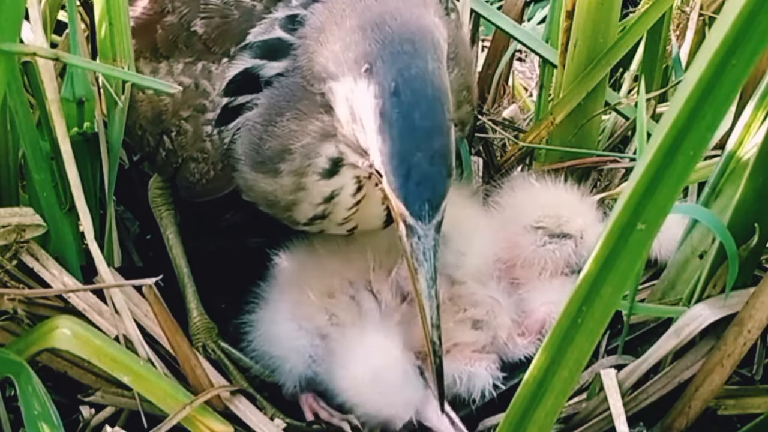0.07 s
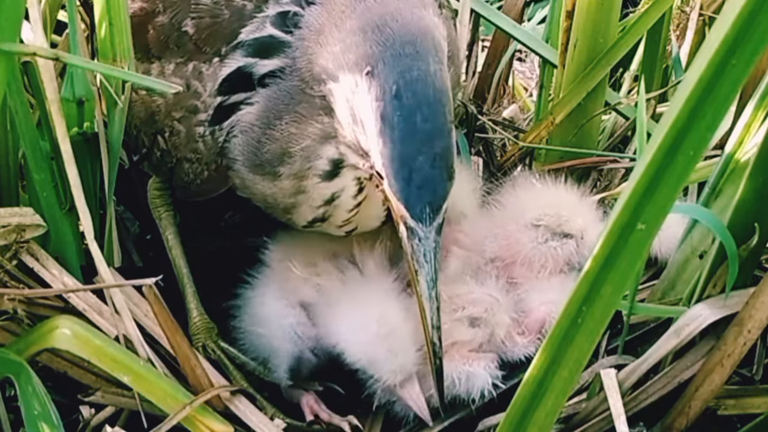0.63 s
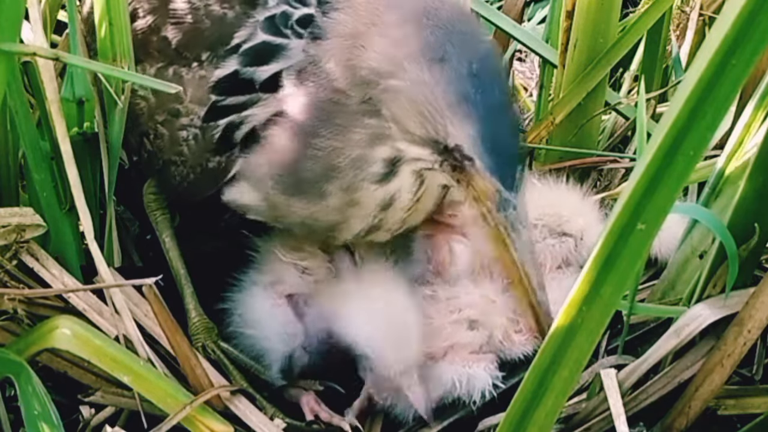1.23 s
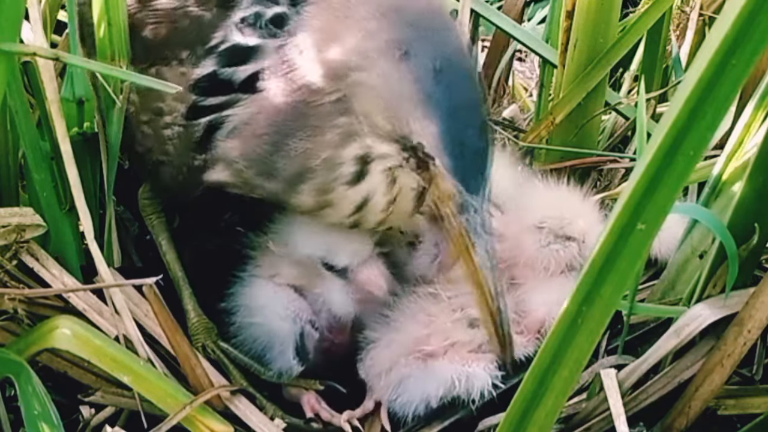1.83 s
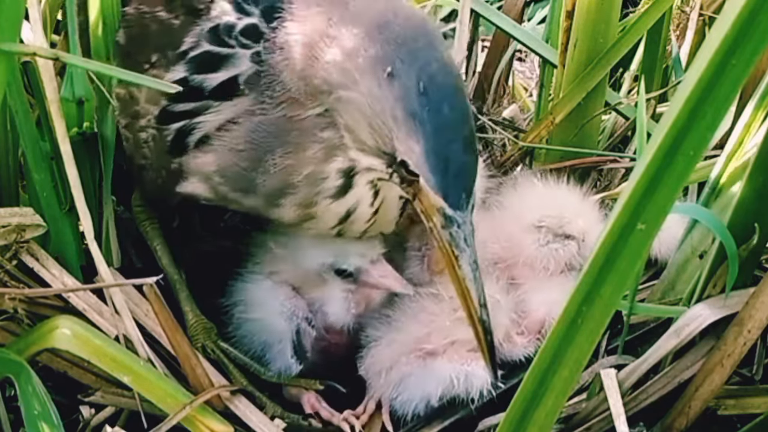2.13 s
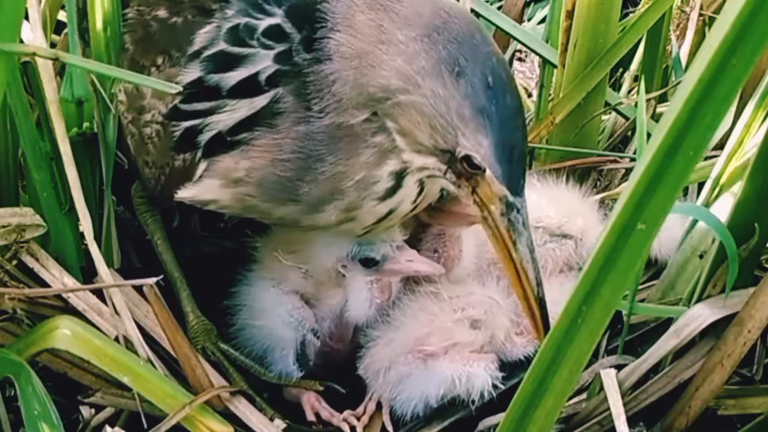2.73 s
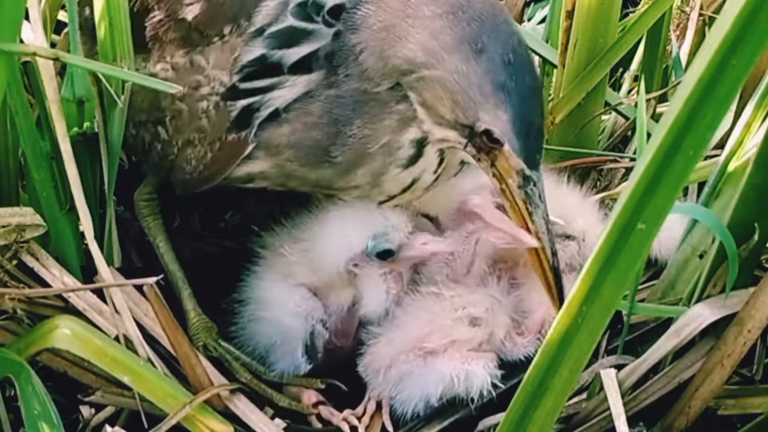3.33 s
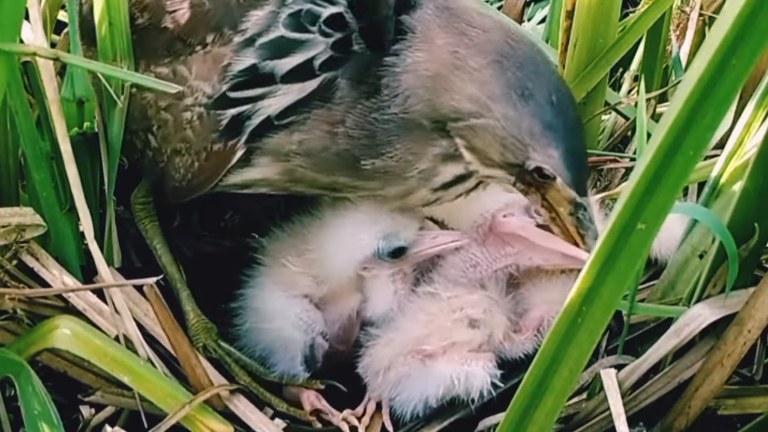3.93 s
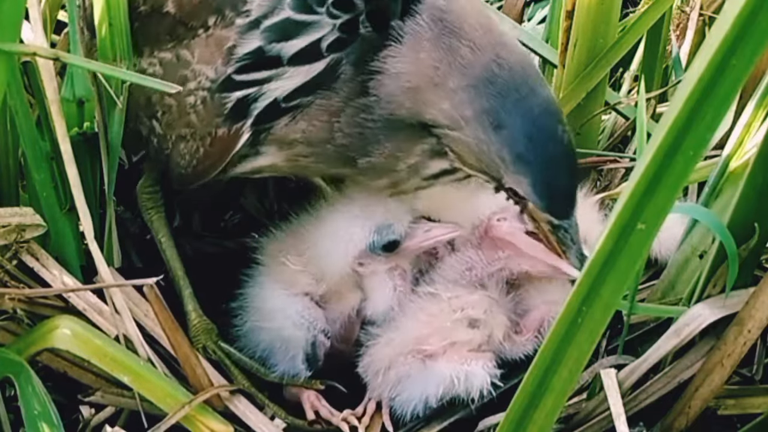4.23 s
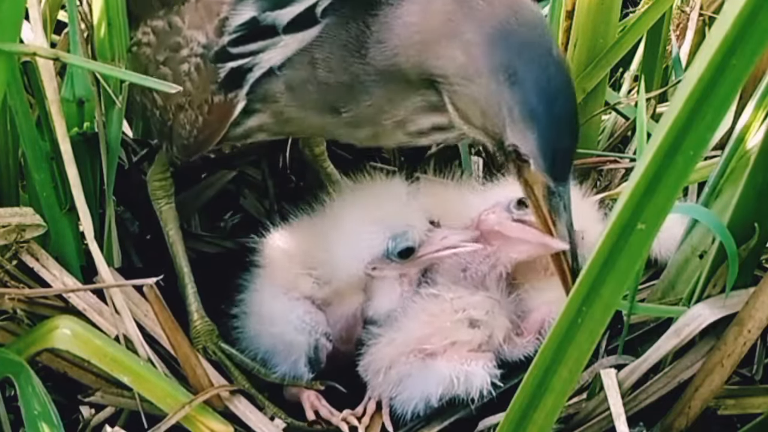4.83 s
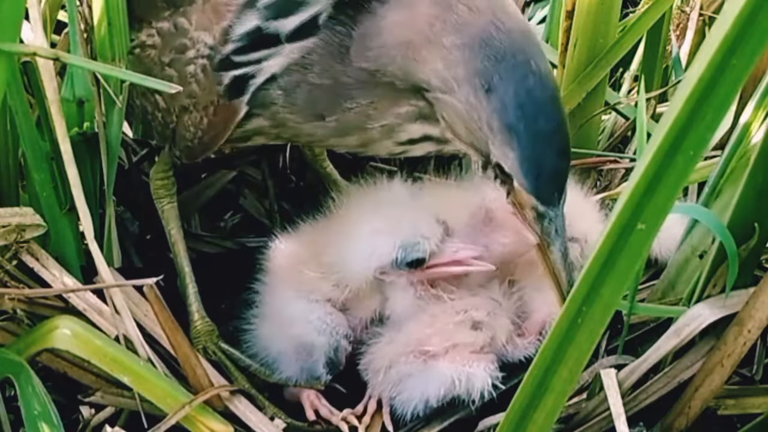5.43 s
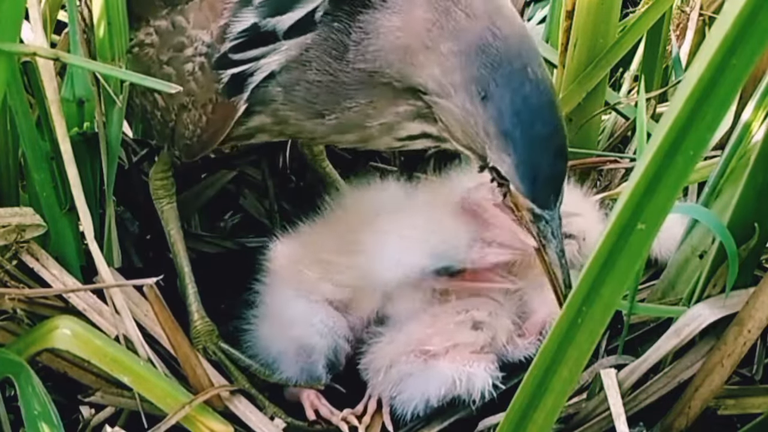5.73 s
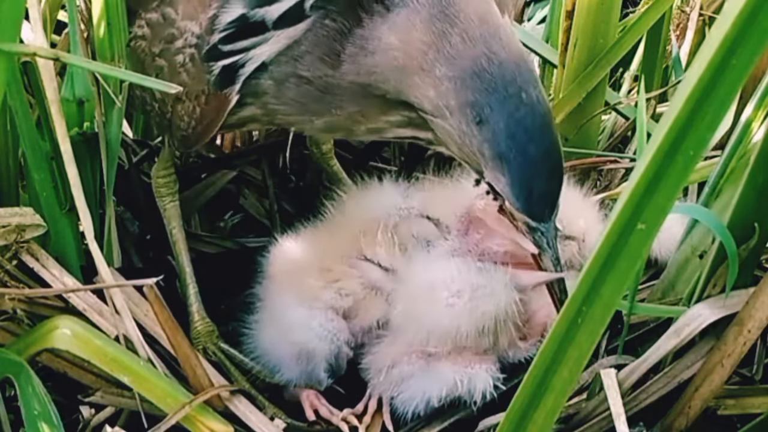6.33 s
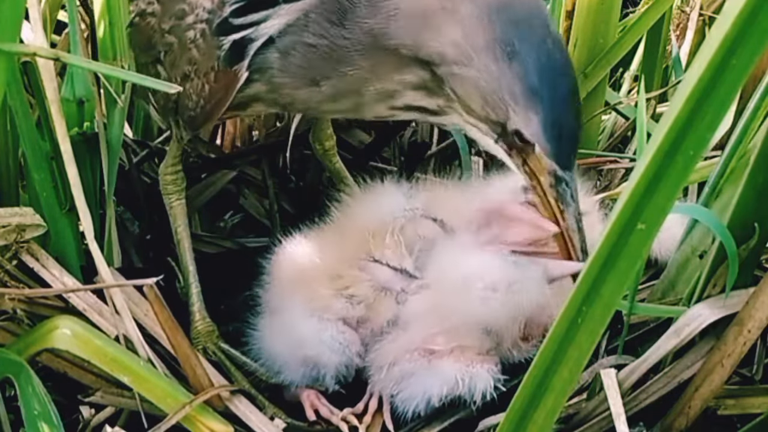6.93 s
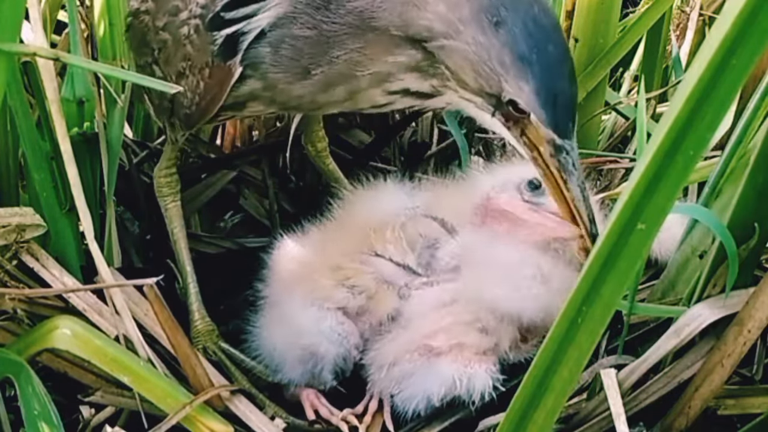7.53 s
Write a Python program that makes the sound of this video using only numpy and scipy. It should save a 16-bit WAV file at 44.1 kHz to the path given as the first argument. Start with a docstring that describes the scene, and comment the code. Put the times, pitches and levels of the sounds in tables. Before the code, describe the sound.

Young herons beg near the microphone in a marsh: first a high cry and short squeals cracking into creaks, later a run of rapid, hoarse, clicking twitters. The parent faintly scuffs and taps the reeds. In the middle, songbirds sing from farther away with falling whistles and repeated syllables, blurred by a short echo. Behind it all are a soft wash of distant birds and a low, faintly humming rumble.

```python
"""Heron chicks in the reeds

Heron chicks beg in a nest: squeals that break into creaks, then quick raspy twitters, while a
parent brushes the reeds. Songbirds slur and whistle farther off, their notes smeared by the trees.
Under it all lie the haze of a distant chorus and a low rumble with a faint hum."""
import sys
import numpy as np
from scipy import signal
from scipy.fft import rfft, irfft, next_fast_len
from scipy.io import wavfile
from scipy.ndimage import uniform_filter1d, map_coordinates

SR = 44100
rng = np.random.default_rng(int(sys.argv[2]) if len(sys.argv) > 2 else 0)


def dump_mix(stems):
    """Bounce the given channels to the path in sys.argv[1] as a 16-bit WAV at rate SR."""
    frames = np.atleast_2d(stems).T  # one column per channel
    limited = np.clip(frames, -1, 1)  # hard clip at full scale
    pcm = np.round(limited * 32767).astype(np.int16)
    wavfile.write(sys.argv[1], SR, pcm)


N = 339129
T = np.arange(N) / SR


def amp(db):
    """Turn decibels into a number to multiply by."""
    return 10 ** (np.asarray(db) / 20)


def unit(x):
    """Scale a signal so that its typical size (rms) is 1."""
    return x / np.sqrt(np.mean(x ** 2) + 1e-20)


def clock(length):
    """The time of each sample in a sound this many seconds long."""
    return np.arange(max(int(length * SR), 16)) / SR


def add(track, start, x):
    """Mix x into the track, beginning at start seconds."""
    i = int(np.clip(round(start * SR), 0, N))
    track[i:i + len(x)] += x[:N - i]


def wobble(t, rate):
    """A smooth random curve that heads for a new value rate times a second."""
    return map_coordinates(rng.standard_normal(int(t[-1] * rate) + 4), [t * rate])


def soft_ends(t, share):
    """Fade in and out; the two fades together take this share of the sound."""
    return signal.windows.tukey(len(t), share)


def phase_of(hz):
    """The running angle of a wave that follows this pitch."""
    return 2 * np.pi * np.cumsum(hz) / SR


def pulses(rate):
    """A 1 each time a cycle ends and 0 in between; rate is in cycles a second."""
    return np.diff(np.floor(np.cumsum(rate) / SR), prepend=-1)


def filtered(x, gain):
    """Turn each frequency in x up or down by gain(hz)."""
    size = next_fast_len(N + 8192)
    return irfft(rfft(x, size) * gain(np.fft.rfftfreq(size, 1 / SR)), size)[:N]


def coloured(x, spectrum):
    """Shape the tone of x with (f/Hz, level/dB) points; white noise keeps its power."""
    freqs, db = np.transpose(spectrum)
    return filtered(x, lambda hz: unit(amp(np.interp(np.log(hz + 1), np.log(freqs), db))))


def patchy_noise(depth_db):
    """Noise whose loudness drifts in patches of time and pitch."""
    spectra = signal.stft(rng.standard_normal(N), nperseg=1024)[2]
    patches = uniform_filter1d(rng.standard_normal(spectra.shape), size=16, axis=0)
    patches = uniform_filter1d(patches, size=6, axis=1)
    return unit(signal.istft(spectra * amp(depth_db * unit(patches)), nperseg=1024)[1][:N])


def echo(x, decay_s):
    """Plants scatter the sound into a blur that builds up, then falls 60 dB in decay_s."""
    t = clock(0.89)
    tail = rng.standard_normal(len(t)) * amp(-60 * t / decay_s) * (1 - np.exp(-t / .012))
    return signal.fftconvolve(x, tail / np.linalg.norm(tail))[:N]


def contour(points):
    """Join (t/s, f/Hz, level/dB) points into time, pitch and gain for every sample."""
    times, hz, db = np.transpose(points)
    t = clock(times[-1] - times[0])
    pitch = uniform_filter1d(np.interp(t + times[0], times, hz), size=120)
    gain = amp(np.interp(t + times[0], times, db)) * soft_ends(t, .03)
    return t, pitch, gain


def run(first, spacing, count):
    """Start times of evenly repeated notes."""
    return first + spacing * np.arange(round(count))


def repeated(shape, calls, waver):
    """One learnt bit of song, with slightly different pitch and stresses each time."""
    out = np.zeros(N)
    t, hz, gain = contour(shape)
    for start, db in calls:
        pitch = hz * (1 + waver * (rng.standard_normal() / 2 + wobble(t, 702)))
        add(out, start, amp(db + 1.3 * wobble(t, 121)) * gain * np.sin(phase_of(pitch)))
    return out


def glides(notes, waver, flutter_db, arch=0):
    """Whistles that slide in pitch; waver and the mid-note arch are shares of that pitch."""
    out = np.zeros(N)
    for start, length, first_hz, last_hz, db in notes:
        t = clock(length)
        slide = 1 / np.linspace(1 / first_hz, 1 / last_hz, len(t))  # fastest where highest
        pitch = slide * (1 + arch * np.sin(np.pi * t / length) + waver * wobble(t, 260))
        gain = amp(db + flutter_db * wobble(t, 90)) * soft_ends(t, .6)
        add(out, start, gain * np.sin(phase_of(pitch)))
    return out


RUMBLE_LEVELS = [(0, -57), (1.3, -57.5), (1.9, -54.5), (7.69, -54.5)]  # how loud the rumble is: t/s, level/dB
RUMBLE_COLOUR = [(25, -47), (90, -39), (125, -11), (180, 1), (400, -3.5), (600, -15.5), (1400, -14.5),
                 (8000, -33.5)]  # its mix of low and high: f/Hz, relative level/dB
HUM_TONES = [(312, -60.5), (339, -63.5)]  # the hum's two tones: f/Hz, level/dB before the swell
def rumble():
    """A far, low rumble with a wavering hum that slowly swells."""
    level = amp(np.interp(T, *np.transpose(RUMBLE_LEVELS)))
    noise = level * coloured(patchy_noise(depth_db=1.5), RUMBLE_COLOUR)
    hum = np.zeros(N)
    for hz, db in HUM_TONES:
        gain = amp(db + 0.79 * wobble(T, 14))
        hum += gain * np.sin(phase_of(hz * (1 + 0.00388 * wobble(T, 6))))
    swell = amp(np.interp(T, [1.5, 6], [-7, 3]))
    return noise + swell * hum


CHORUS_LEVELS = [(.7, -45.5), (1.3, -48.5), (2.3, -41), (2.9, -43), (6, -40), (6.5, -42.5)]  # how busy the distant birds are: t/s, relative level/dB
CHORUS_COLOUR = [(900, -26.5), (1850, -2), (2400, 4), (3300, 6.5), (4500, 3), (5250, -5.5), (7600, -12),
                 (8600, -48)]  # their mix of low and high: f/Hz, relative level/dB
def chorus():
    """The birds of the marsh, so far away that they blur into a haze of noise."""
    level = amp(np.interp(T, *np.transpose(CHORUS_LEVELS)) - 7.5)
    return level * coloured(patchy_noise(depth_db=2), CHORUS_COLOUR)


def chatter(span_s, count, pitch_hz, spread, length_s, level_db):
    """Small notes from many bills, mostly sliding down, as loud as the chorus is busy."""
    starts = rng.uniform(*span_s, count)
    height, slide, stretch, stress = rng.standard_normal((count, 4)).T
    first_hz = pitch_hz * np.exp(spread * height)
    last_hz = first_hz * np.exp(spread * (slide / 2 - 1.5))
    db = np.interp(starts, *np.transpose(CHORUS_LEVELS)) + level_db + stress - 2 * height ** 2
    notes = zip(starts, length_s * amp(stretch), first_hz, last_hz, db)
    return glides(notes, waver=0.032, flutter_db=5.5)


# Long, distant notes: t/s, length/s, first f/Hz, last f/Hz, relative level/dB
FAR_NOTES = [(.33, 0.27, 3910, 3780, -51.5), (.6, 0.23, 2450, 2420, -56), (1.06, 0.22, 2410, 2350, -56),
             (3.09, 0.16, 2326, 2460, -40), (3.7, 0.19, 1940, 1734, -47), (4.41, 0.32, 2620, 1957, -41)]
THIN_WHISTLE = [(0, 0.1, 8270, 7850, -64)]  # one very high note, same columns
def far_whistles():
    """Birds far off hold notes that slide gently."""
    held = glides(FAR_NOTES, waver=.03, flutter_db=2)
    return held + glides(THIN_WHISTLE, waver=.0075, flutter_db=2)


TSEEW_SHAPE = [(0, 6420, -15), (.014, 5026, -1), (.033, 4974, -0.5), (.046, 4430, -3), (.085, 4140, -9.5)]  # one call: t/s from its start, f/Hz, relative level/dB
TSEEW_CALLS = [(2.472, -41.5), (2.839, -41.5), (3.877, -41.5), (6.619, -42), (7.337, -41.5)]  # each time it is sung: t/s, relative level/dB
def tseews():
    """A songbird's high "tseew", falling in two steps."""
    return repeated(TSEEW_SHAPE, TSEEW_CALLS, waver=0.02)


HOOK_NOTES = [(4.558, 4340, -40), (5.243, 4380, -39), (5.553, 5500, -51)]  # notes that drop and level out: t/s, held f/Hz, relative level/dB
def hooks(length_s=0.052, drop_hz=1565, settle_s=0.011):
    """Each whistle starts high and drops quickly onto its held note."""
    out, t = np.zeros(N), clock(length_s)
    for start, held_hz, db in HOOK_NOTES:
        pitch = held_hz + drop_hz * np.exp(-t / settle_s)
        add(out, start, amp(db) * np.sin(phase_of(pitch)) * soft_ends(t, .5))
    return out


SCRATCHES = [(3.956, .048, -50.5), (4.019, 0.069, -51.5)]  # scratchy bits of song: t/s, length/s, relative level/dB
def scratches(band_hz=(5200, 6600)):
    """Brief, soft swells of high, grainy noise."""
    out = np.zeros(N)
    band = signal.butter(2, band_hz, "bandpass", fs=SR, output="sos")
    for start, length, db in SCRATCHES:
        t = clock(length)
        grains = unit(signal.sosfilt(band, rng.standard_normal(len(t))) * amp(2 * wobble(t, 260)))
        add(out, start, amp(db) * grains * soft_ends(t, .5))
    return out


# A faint flick up, a quick arch and a fall: t/s from its start, f/Hz, relative level/dB
SYLLABLE_SHAPE = [(0, 4600, -5), (.009, 6200, -19), (.012, 3500, -11), (.018, 4950, -4), (.025, 3800, 2.5),
                  (.032, 4150, -2), (.039, 3600, -20), (.048, 3250, 2), (.06, 2980, 2), (.078, 2300, -11)]
# Its runs: first t/s, spacing/s, count, level/dB, echo level/dB relative to the song
SYLLABLE_RUNS = [(2.923, .1485, 5, -37.5, -2), (5.053, .1355, 6, -40.5, -10)]
def syllables():
    """A second songbird repeats one syllable, blurred by quick echoes off the reeds."""
    out = np.zeros(N)
    for first, spacing, count, db, echo_db in SYLLABLE_RUNS:
        calls = [(start, db) for start in run(first, spacing, count)]
        song = repeated(SYLLABLE_SHAPE, calls, waver=.027)
        out += song + amp(echo_db) * echo(song, decay_s=.16)
    return out


# Runs of falling notes: first t/s, spacing/s, count, length/s, first f/Hz, level/dB
FALLING_RUNS = [(2.589, .058, 5, .028, 4500, -39.5), (4.809, .039, 5, .016, 5100, -41),
                (6.277, 0, 1, .021, 5900, -41)]
RISE_TIMES = [3.715, 3.86]  # two rising notes: t/s
def slurs(rise_s=.055, rise_hz=(2030, 3550), rise_db=-39):
    """Quick sliding notes: most fall by a third of their pitch, two husky ones rise."""
    falls = [(start, length, hz, hz * 2 / 3, db)
             for first, spacing, count, length, hz, db in FALLING_RUNS
             for start in run(first, spacing, count)]
    rises = [(start, rise_s, *rise_hz, rise_db) for start in RISE_TIMES]
    return glides(falls, waver=.02, flutter_db=2) + glides(rises, waver=.05, flutter_db=2)


FLUTE_NOTES = [(1.98, .13, 1714, 1886, -47), (2.33, 0.087, 1990, 2130, -41.5),
               (2.748, 0.073, 2676, 2594, -38.5), (3.63, 0.082, 2120, 1867, -46),
               (4.25, 0.12, 2069, 2142, -35.5)]  # low, clear notes: t/s, length/s, first f/Hz, last f/Hz, level/dB
def fluting():
    """A nearer bird whistles, lifting each note a little in the middle."""
    return glides(FLUTE_NOTES, waver=.008, flutter_db=1, arch=.03)


def songbirds():
    """The farther the singer, the more of its song arrives as a blurred echo."""
    high = tseews() + hooks() + scratches()
    near = syllables() + slurs()
    low = fluting()
    far = far_whistles()
    chips = chatter(span_s=(2.5, 4.9), count=260, pitch_hz=3800, spread=.2, length_s=.015, level_db=-3)
    warble = chatter(span_s=(2.35, 4), count=110, pitch_hz=2230, spread=.08, length_s=.05, level_db=-9)
    direct = near + low + amp(-1.5) * high + amp(-9) * (far + chips)
    near_echo = amp(-3) * echo(near + high + low / 2 + chips, decay_s=0.6)
    far_echo = echo(far + warble, decay_s=0.7)
    return direct + near_echo + far_echo


PEEPS = [(5.972, 4530, -42), (6.318, 4170, -38), (6.981, 4550, -37.5), (7.091, 4560, -39),
         (7.203, 4500, -40.5)]  # high peeps: t/s, first f/Hz, level/dB
def peeps(length_s=0.035, end_ratio=0.88):
    """Thin, short peeps that fall slightly, probably a songbird, heard between the begging calls."""
    notes = [(start, length_s, hz, hz * end_ratio, db) for start, hz, db in PEEPS]
    return glides(notes, waver=0.039, flutter_db=1.5)


RUSTLES = [(1.545, 0.16, -47), (2.399, 0.025, -46.5), (4.661, 0.0059, -42.5), (7.351, 0.0026, -42)]  # brushes and taps on the reeds: t/s, length/s, level/dB
def rustles():
    """The parent shifts against the reeds, making soft scuffs that fade."""
    out = np.zeros(N)
    for start, length, db in RUSTLES:
        t = clock(length)
        gain = amp(db + 2.2 * wobble(t, 200)) * np.sqrt(1 - t / length)
        add(out, start, gain * rng.standard_normal(len(t)))
    return coloured(out, [(600, -24), (1600, 3.5), (2200, -5), (4500, -4.5), (8000, -28.5)])


def throat(x, band_hz=(1100, 4500)):
    """A chick's throat lets one broad band of frequencies through."""
    return signal.sosfilt(signal.butter(4, band_hz, "bandpass", fs=SR, output="sos"), x)


CRACK_TIMES = [.8575, .8715, .917, 1.504, 1.75]  # moments when the voice cracks: t/s
def chick_voice(start, t, hz, overtone_db, side_db, crack_drop=.19, recover_s=.0035):
    """A raspy tone that cracks now and then: its pitch drops at once and slides back."""
    now = start + t
    crack = sum((now >= at) * np.exp(-np.abs(now - at) / recover_s) for at in CRACK_TIMES)
    crack = uniform_filter1d(crack, size=60)
    phase = phase_of(hz * (1 - crack_drop * crack + .01 * wobble(t, 900)))
    # A slower beat of the voice's membrane, every fourth cycle, adds side tones.
    side_tones = np.sin(phase * 5 / 4) + .5 * np.sin(phase * 3 / 2) + .5 * np.sin(phase * 3 / 4)
    side_tones *= amp(side_db + 3 * wobble(t, 50))
    # The throat passes the overtone only on low notes.
    overtone = amp(overtone_db) * (2500 / hz) ** 6 * np.sin(2 * phase)
    rasp = amp(-19) * throat(rng.standard_normal(len(t)))
    return (1 - crack / 2) * np.sin(phase) + overtone + side_tones + rasp


PLEA_PITCH = [(0.82, 2536), (0.832, 3000), (0.849, 3646), (0.878, 3227), (0.904, 3280), (0.925, 2690),
              (0.947, 2460), (0.968, 1920)]  # the arching tune of a chick's long cry: t/s, f/Hz
def plea(peak_db=-28, peak_s=0.053, swell_db_per_s=234, sink_db_per_s=63, release_s=0.018):
    """One long cry that swells and quavers on the way up, then sinks smoothly."""
    quaver_s, quaver_hz, quaver_depth = 0.06, 62.2, 0.092
    out, start = np.zeros(N), PLEA_PITCH[0][0]
    t, hz, gain = contour([(at, hz, peak_db) for at, hz in PLEA_PITCH])
    fade_db = np.maximum(swell_db_per_s * (peak_s - t), sink_db_per_s * (t - peak_s))
    gain *= amp(-fade_db) * np.minimum((t[-1] - t) / release_s, 1)
    quaver = 2 * np.abs(np.sin(np.pi * quaver_hz * (t - .0055))) - 1.3
    quaver *= np.clip((quaver_s - t) / .003, 0, 1)
    pitch = hz * (1 + quaver_depth * quaver)
    add(out, start, gain * chick_voice(start, t, pitch, overtone_db=-20, side_db=-20))
    return out


# Short squeals: t/s, length/s, first f/Hz, last f/Hz, leap up or down/Hz, level/dB
SQUEALS = [(1.497, .05, 3500, 3900, -430, -33), (1.712, .060, 2850, 3080, 600, -21.2),
           (1.788, .060, 3200, 2830, 580, -21), (4.086, .012, 2200, 2400, 0, -25),
           (4.132, .009, 2280, 2550, 0, -22.5), (4.181, .036, 2620, 2540, 0, -24)]
def squeals(throat_hz=3160, thinning_db=13, attack_s=.006, release_s=.003):
    """Short cries, some leaping midway, that thin out above the pitch at which the throat rings."""
    leap_at_s, leap_width_s = .0255, .0072
    sag_share, sag_s = .11, .004  # the pitch gives way as a squeal ends
    out = np.zeros(N)
    for start, length, first_hz, last_hz, leap_hz, db in SQUEALS:
        t = clock(length)
        from_leap = (t - leap_at_s) / leap_width_s
        leap = (1 - .5 * from_leap ** 2) * np.exp(-(from_leap / 2) ** 4)  # a peak between two dips
        hz = np.linspace(first_hz, last_hz, len(t)) + leap_hz * leap
        hz *= 1 - sag_share * np.exp((t - t[-1]) / sag_s)
        above_throat = 1 / (1 + np.exp((throat_hz - hz) / 70))
        fades = np.minimum(np.minimum(t / attack_s, (t[-1] - t) / release_s), 1)
        gain = amp(db - thinning_db * above_throat) * fades
        add(out, start, gain * chick_voice(start, t, hz, overtone_db=-32, side_db=-26))
    return out


# Creaks: t/s, length/s, first pulse rate/Hz, throat f/Hz, starting level/dB
CREAKS = [(1.702, .012, 360, 2500, -34), (1.709, 0.005, 310, 2520, -24), (1.774, 0.023, 380, 2690, -20.5),
          (1.846, 0.03, 266, 2700, -22), (2.096, 0.028, 260, 2540, -28), (2.13, 0.029, 163, 2370, -34),
          (2.239, 0.032, 380, 2430, -26), (4.106, 0.03, 230, 2800, -31), (4.142, 0.04, 430, 2288, -27),
          (4.144, 0.019, 200, 3906, -28), (4.167, 0.06, 380, 4010, -27.5), (4.217, 0.059, 300, 2430, -27.5)]
def creaks(snap_db=-11, ring_s=.0009, end_rate_ratio=0.7, fade_db_per_s=246):
    """The voice breaks into slowing, fading pulses, each a snap that briefly rings the throat."""
    out, t = np.zeros(N), clock(0.014)
    ring = t / ring_s * np.exp(1 - t / ring_s)
    for start, length, rate, hz, db in CREAKS:
        slowing_rate = np.linspace(rate, rate * end_rate_ratio, len(clock(length)))
        for at in np.flatnonzero(pulses(slowing_rate)) / SR:
            late, stress_db, detune = rng.standard_normal(3)
            tone = ring * np.sin(2 * np.pi * hz * (1 + .05 * detune) * t)
            snap = amp(snap_db) * ring ** 2 * rng.standard_normal(len(t))
            gain = amp(db - fade_db_per_s * at + stress_db) * (1 if at else .5)  # softer first pulse
            add(out, start + at + late / rate / 7, gain * (tone + snap))
    return throat(out)


# Begging calls: middle t/s, length/s, relative twitter level/dB, relative rasp level/dB
BEGGING_CALLS = [(2.115, 0.047, -52, -44.5), (4.486, 0.037, -31, -46.5), (4.59, .05, -52, -46),
                 (5.542, 0.035, -48, -50), (5.718, 0.044, -31, -50.5), (5.815, 0.054, -32, -48),
                 (5.921, 0.072, -28, -43.5), (6.035, 0.063, -25, -47.5), (6.12, 0.071, -29.5, -45),
                 (6.254, 0.084, -35, -46.5), (6.689, 0.039, -34, -49), (6.853, 0.028, -24, -60),
                 (6.938, 0.05, -25.5, -49.5), (7.045, 0.079, -25.5, -44), (7.158, 0.085, -26.5, -45.5),
                 (7.27, 0.094, -27, -44), (7.358, 0.098, -29.5, -42), (7.662, 0.061, -29, -46)]
def twitters(crest_hz=4257, arch=0.35, warble_hz=96.16, warble_depth=0.098, jitter=.046):
    """Each twitter arches in pitch while a fast, uneven warble cuts it into hoarse little chips."""
    clear_s, fall_s, break_db_per_s = 0.029, .021, 903
    edge_db, throb_db, overtone_db, hoarse_db = 3, 4, -19, -15
    out = np.zeros(N)
    for middle, length, db, _ in BEGGING_CALLS:
        t = clock(length)
        crest = max(length - fall_s, length / 2)
        edge = np.maximum((crest - t) / crest, (t - crest) / (length - crest))  # 0 at crest, 1 at ends
        beat = phase_of(warble_hz * amp(2.04 * wobble(t, 59.6)))
        chip = 2 * np.abs(np.cos((beat - np.interp(crest, t, beat)) / 2)) - 1  # one chip tops the arch
        phase = phase_of(crest_hz * (1 - arch * edge + warble_depth * chip + jitter * wobble(t, 1800)))
        # Long calls start clear, then lose their voice before the crest; the hoarse noise carries on.
        broken_db = break_db_per_s * np.maximum(np.minimum(t - clear_s, crest - .5 / warble_hz - t), 0)
        voice_db = db - broken_db - edge_db * edge + throb_db * (chip - 3) + 2 * wobble(t, 500)
        overtone = amp(overtone_db) * edge * np.sin(2 * phase)
        voice = amp(voice_db) * soft_ends(t, .2) * (np.sin(phase) + overtone)
        hoarse = amp(db + hoarse_db + 2 * chip) * np.sin(np.pi * t / length) * wobble(t, 2400)
        add(out, middle - length / 2, voice + hoarse * np.sin(phase))
    return out


RASP_COLOUR = [(300, -24), (800, -4.5), (1450, 4.5), (2000, -2.5), (3000, 4), (4500, -4), (5600, -0.5),
               (7500, -8), (8600, -32.5)]  # the rasp's mix of low and high: f/Hz, relative level/dB
def rasps(length_s=0.044, puffs_per_s=400, puff_s=0.0011, level_db=-1.5):
    """The hoarse, clicking part of each begging call: uneven puffs of noise through the open bill."""
    breath, t = np.zeros(N), clock(length_s)
    swell = np.sin(np.pi * (t / length_s) ** 0.59)
    for middle, _, _, db in BEGGING_CALLS:
        clicks = pulses(puffs_per_s * amp(3 * wobble(t, 300))) * amp(3.5 * rng.standard_normal(len(t)))
        puffs = unit(signal.lfilter([1], [1, -np.exp(-1 / (puff_s * SR))], clicks))
        add(breath, middle - 0.38 * length_s, amp(db + level_db) * puffs * swell)
    return coloured(breath * rng.standard_normal(N), RASP_COLOUR)


def scene():
    """The close sounds with a short echo off the reeds, and the marsh behind."""
    close = plea() + squeals() + creaks() + twitters() + peeps() + rasps() + rustles()
    reeds = amp(-13.5) * echo(close, decay_s=.25)
    return (close + reeds + songbirds() + chorus() + rumble())[None]


def record(dry, top_hz=8550, hiss_db=-86.5, hiss_top_hz=15500):
    """Cut off the highest treble and add a faint, steady hiss that reaches higher."""
    sound = filtered(dry[0], lambda hz: 1 / np.sqrt(1 + (hz / top_hz) ** 120))
    hiss = amp(hiss_db) * rng.standard_normal(N)
    return filtered(sound + hiss, lambda hz: hz < hiss_top_hz)[None]


dry = scene()
out = record(dry)
dump_mix(out)
```